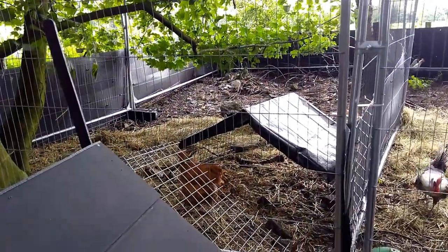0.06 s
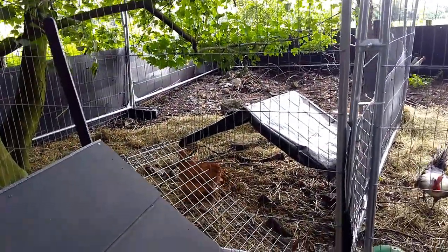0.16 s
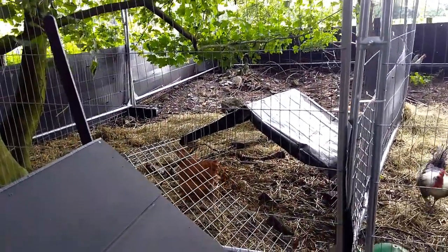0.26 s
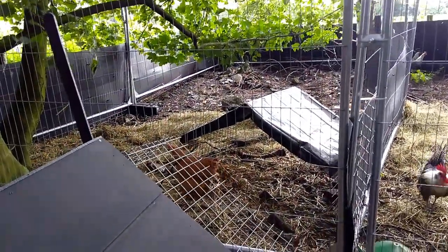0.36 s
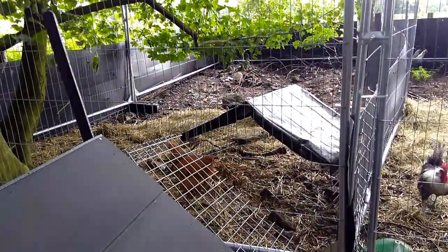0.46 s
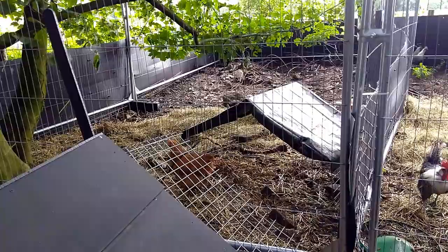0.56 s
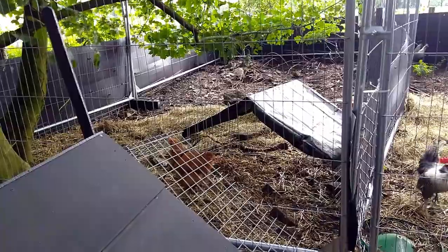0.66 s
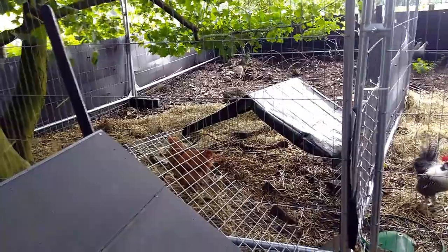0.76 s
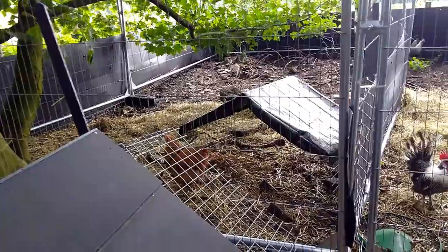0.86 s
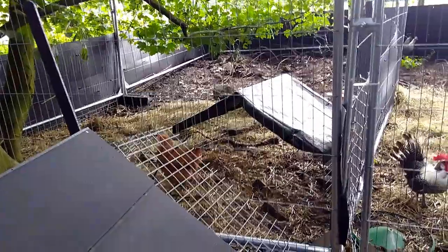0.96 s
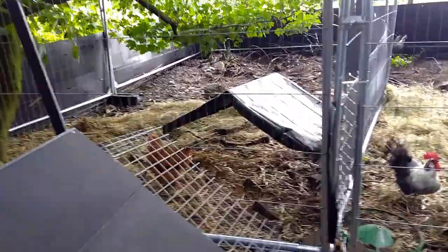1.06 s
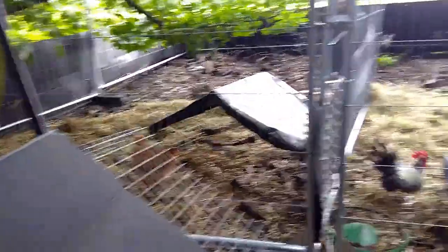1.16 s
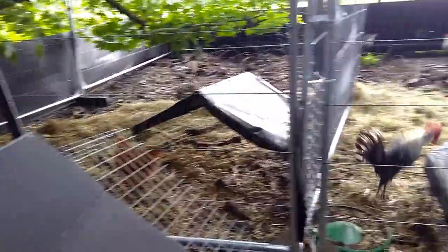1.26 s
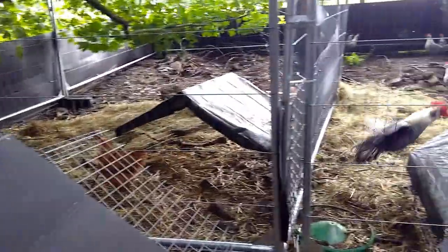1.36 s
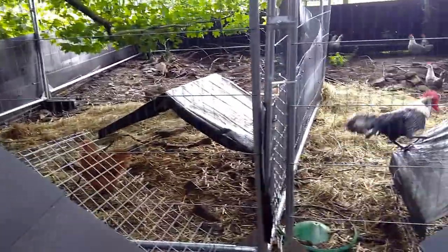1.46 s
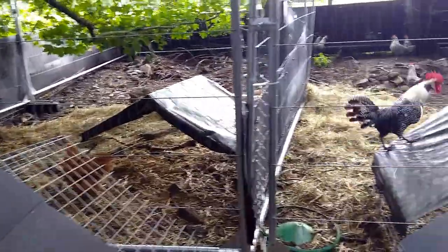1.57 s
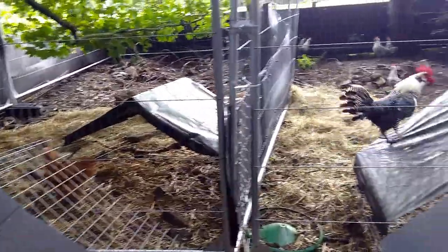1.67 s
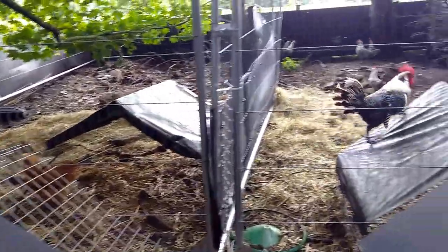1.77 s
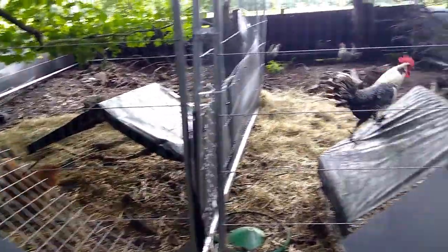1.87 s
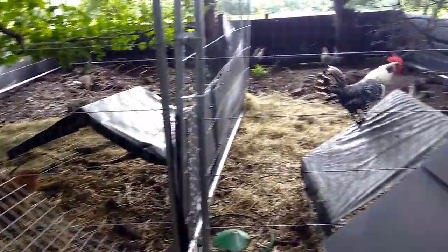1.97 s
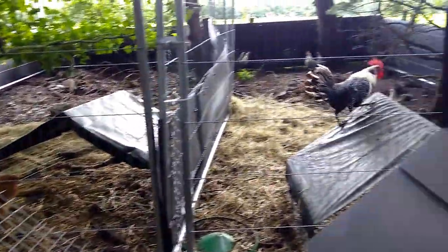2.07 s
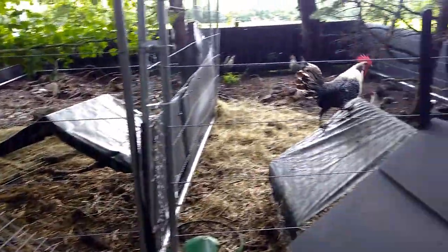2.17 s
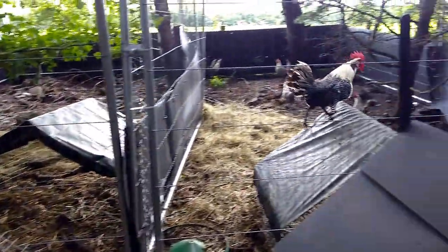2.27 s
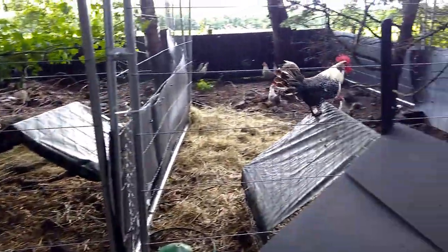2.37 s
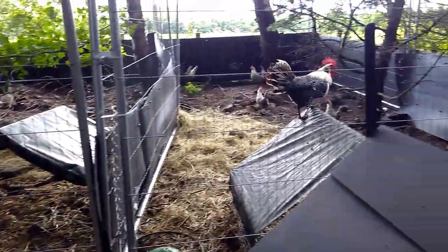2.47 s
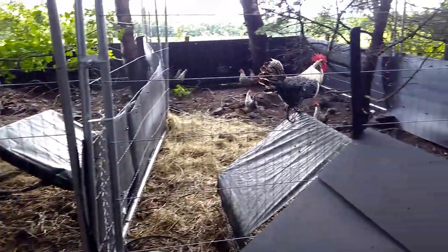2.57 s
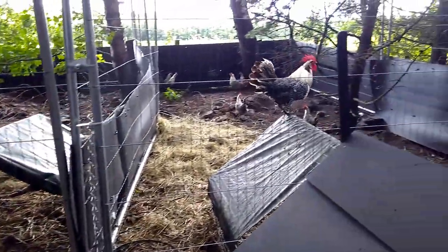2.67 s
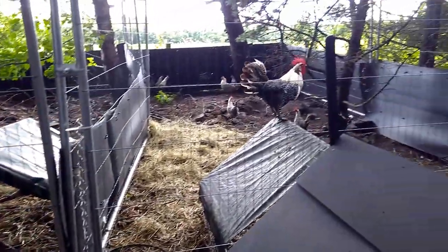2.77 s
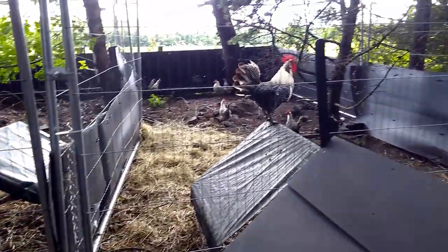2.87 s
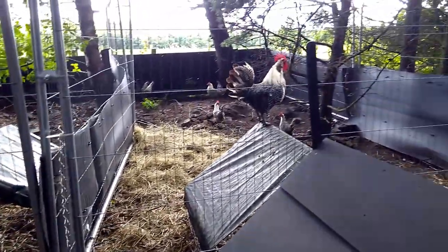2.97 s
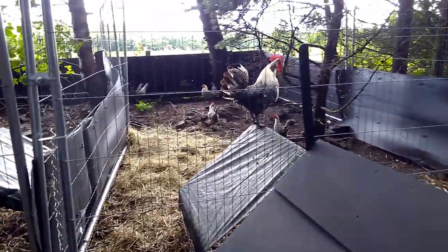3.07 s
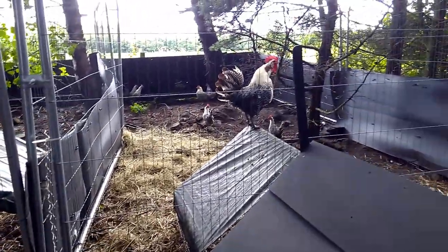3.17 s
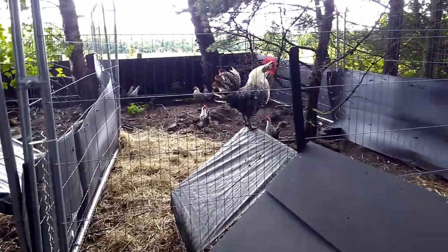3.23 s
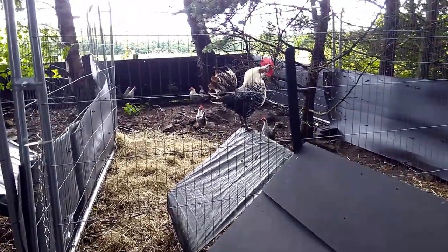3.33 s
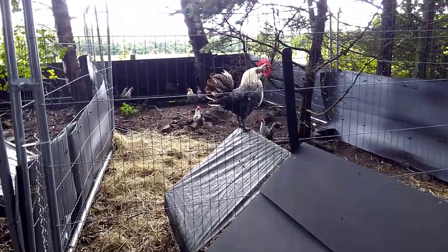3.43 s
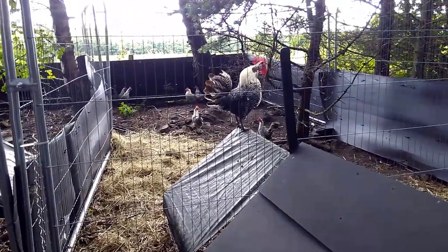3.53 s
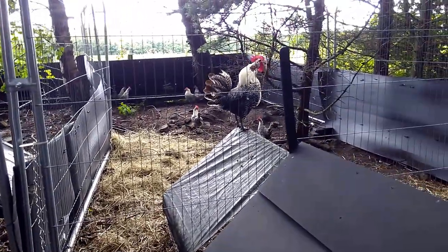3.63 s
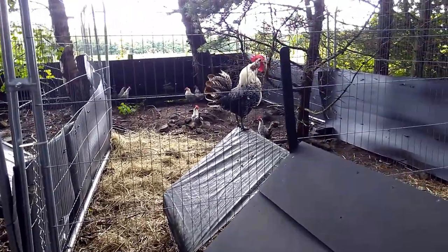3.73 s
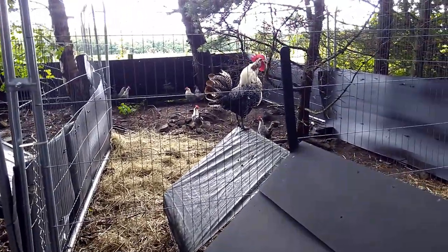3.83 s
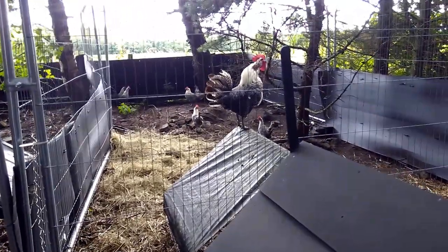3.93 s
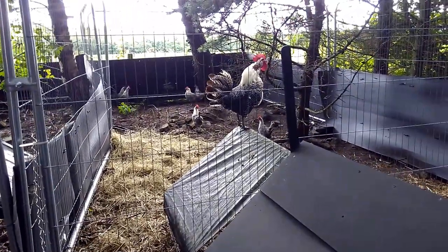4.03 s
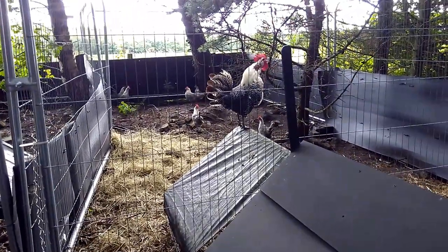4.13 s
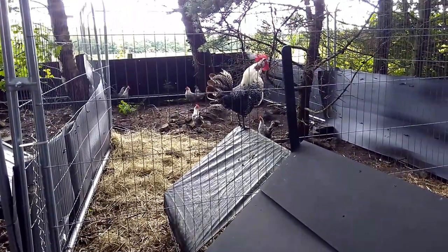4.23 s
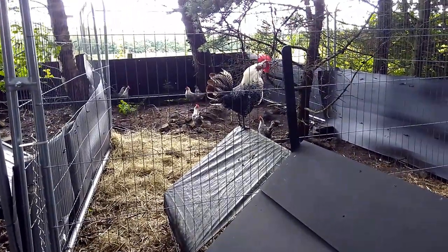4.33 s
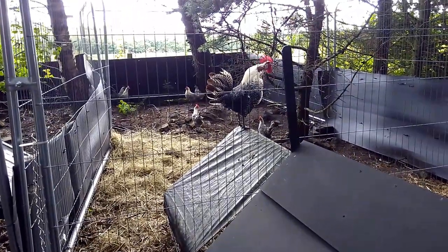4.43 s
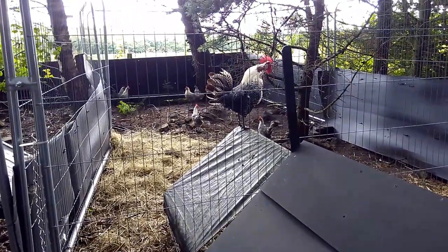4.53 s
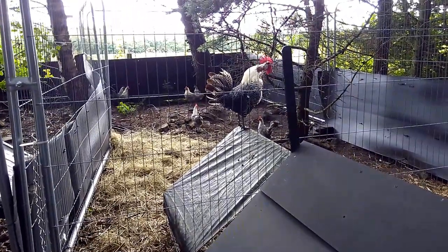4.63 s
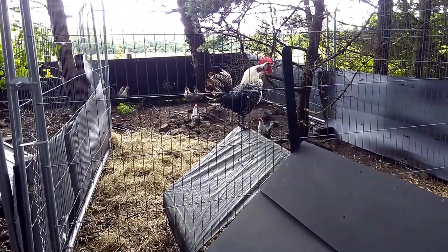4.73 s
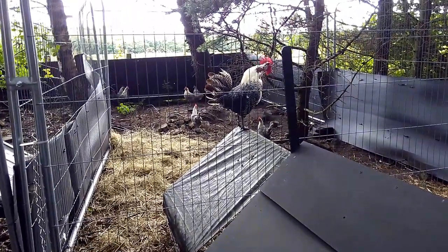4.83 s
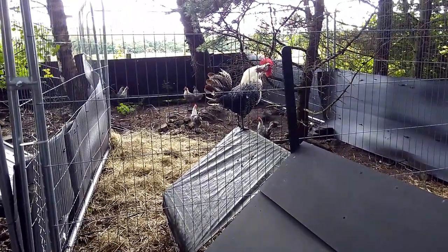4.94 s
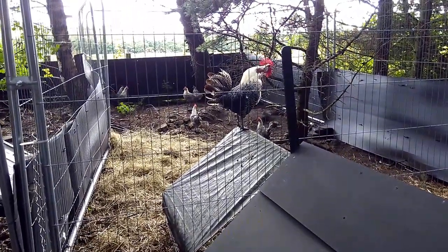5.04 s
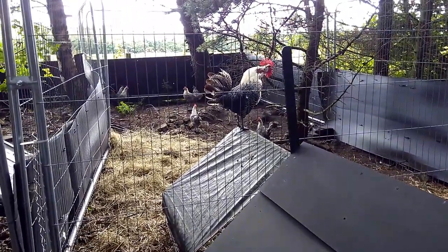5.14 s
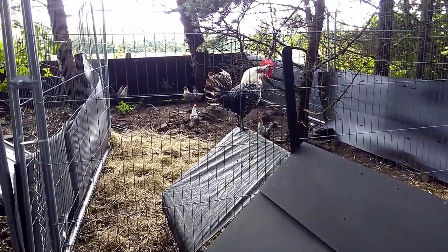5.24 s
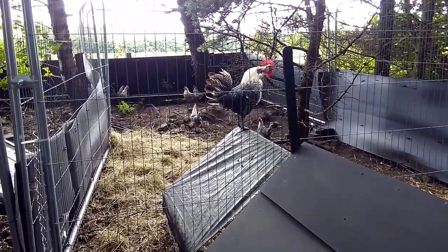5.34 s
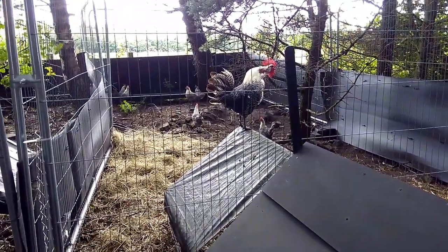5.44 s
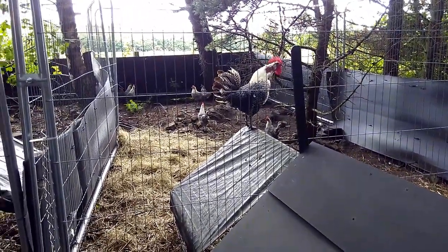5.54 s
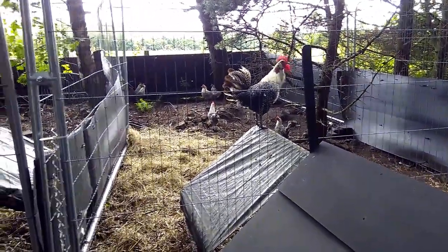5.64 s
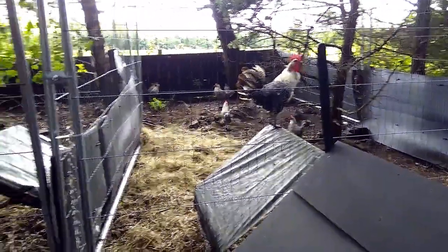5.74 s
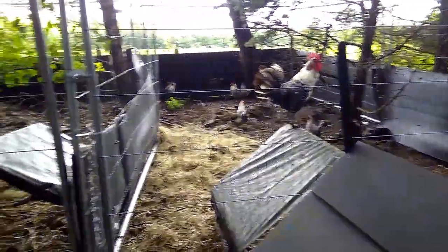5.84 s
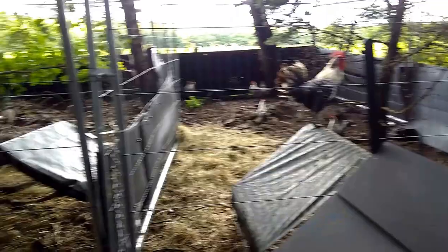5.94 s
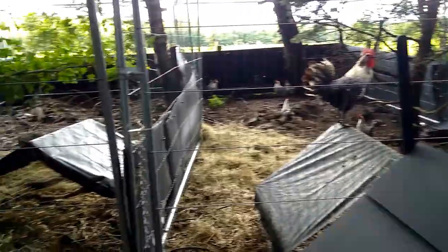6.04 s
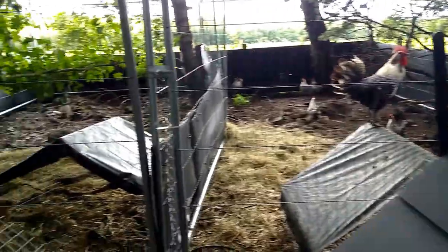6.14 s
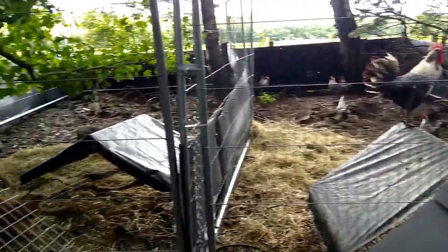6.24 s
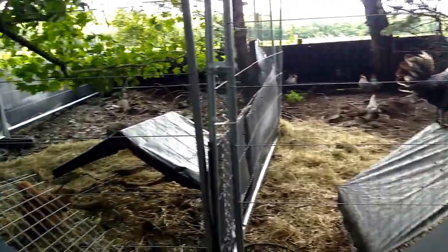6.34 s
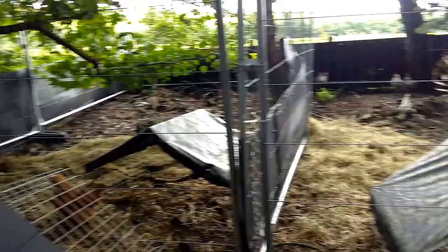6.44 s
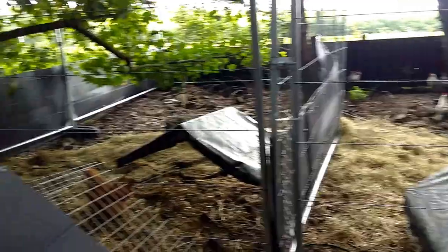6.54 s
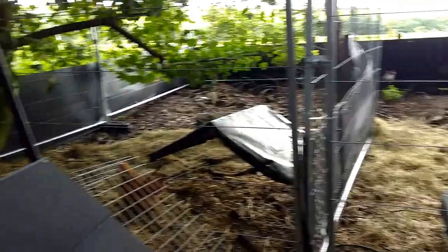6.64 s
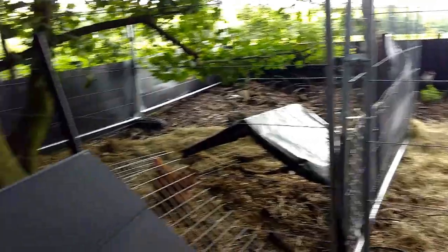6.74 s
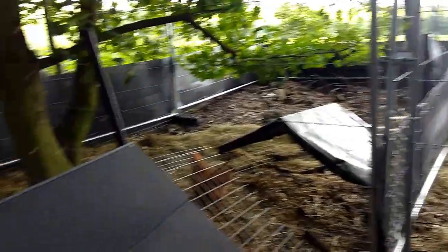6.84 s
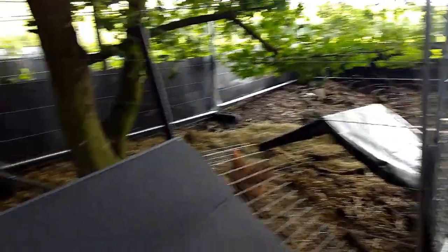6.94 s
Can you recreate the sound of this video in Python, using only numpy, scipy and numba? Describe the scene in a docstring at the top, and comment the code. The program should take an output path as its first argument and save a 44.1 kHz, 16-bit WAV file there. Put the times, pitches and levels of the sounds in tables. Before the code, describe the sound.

A breezy poultry yard heard through a handheld phone's wide stereo microphones. A faint low hush of distant traffic and leaves runs throughout, with irregular wind rumbles and bumps, strongest near 1.25 s and 1.7 s. A light tap comes at 0.3 s, then a hen gives a few short, quiet, low clucks between 0.6 and 0.95 s. From about 1 s straw and feathers rustle; between 1.2 and 2.4 s claws crack, knock and rattle on a sheet-covered shelter. It calms, with a gust at 3.4 s. The rooster, a few metres away and slightly right, then crows loudly and hoarsely: short syllables at 3.4 and 3.7 s, a longer one from 3.85 to 4.25 s, and a raspy, sustained cry from 4.4 s, cut off around 5.5 s. Fences and a sheet wall return a brief ringing echo. Quiet hush remains, with a soft claw knock at 6.2 s, a wind bump near 6.65 s and light rustling to 7 s.

```python
"""Wind wobbles and rumbles at two microphone ports over a distant hush of noise bands; grains of straw and feathers rustle.
Claws click on a sheet-covered shelter: cracks with ringing bands. A hen clucks: pulses through throat modes.
From 3.4 s a rooster a few metres away crows four hoarse syllables: uneven pulses and air noise through
windpipe modes. A last claw click follows at 6.2 s. Fences and a far sheet wall echo rooster, hen and claws.
The phone widens its picture by taking a delayed copy of each port away from the other."""
import sys
import numpy as np
from scipy import signal
from scipy.fft import rfft, irfft
from scipy.io import wavfile
from scipy.ndimage import uniform_filter1d, minimum_filter1d
from numba import njit

SR = 44100
rng = np.random.default_rng(int(sys.argv[2]) if len(sys.argv) > 2 else 0)


def digitize_waveform(pressure):
    """Quantize a signal to 16-bit integers and store it at the path in sys.argv[1].

    Rows of a 2-D input are taken as channels; values are limited to [-1, 1].
    """
    field = np.atleast_2d(pressure).T
    bounded = np.clip(field, -1, 1)
    quanta = np.round(bounded * 32767).astype(np.int16)
    wavfile.write(sys.argv[1], SR, quanta)


N = 308700
TIME = np.arange(N) / SR


def undb(db):
    """Amplitude factor of a dB value."""
    return 10 ** (np.asarray(db) / 20)


def level(x, db):
    """Scale to an RMS in dB."""
    return x * undb(db) / np.sqrt(np.mean(x ** 2))


def curves(table):
    """Columns of a table, joined by straight lines in time."""
    time_s, *columns = np.transpose(table)
    return [np.interp(TIME, time_s, column) for column in columns]


def shaped(x, points, lag_s=0):
    """Filter by (frequency [Hz], gain) points, joined on a log frequency axis, and delay."""
    hz = np.fft.rfftfreq(N, 1 / SR)
    point_hz, point_gain = np.transpose(points)
    gain = np.interp(np.log(hz + 1), np.log(point_hz), point_gain)
    delay = np.exp(-2j * np.pi * hz * lag_s)
    return irfft(rfft(x) * gain * delay, N)


@njit
def svf(x, hz, width_hz):
    """State-variable band-pass with a moving centre and width, gain 1 at the centre."""
    y, band_state, low_state = np.empty(len(x)), 0., 0.
    for i in range(len(x)):
        g, k = np.tan(np.pi * hz[i] / SR), width_hz[i] / hz[i]
        v = (band_state + g * (x[i] - low_state)) / (1 + g * (g + k))
        band_state, low_state, y[i] = 2 * v - band_state, low_state + 2 * g * v, k * v
    return y


def band(x, hz, width_hz):
    """Band-pass with fixed or moving centre and width; the tiny offset avoids denormals."""
    return svf(x + 1e-18, hz * np.ones(len(x)), width_hz * np.ones(len(x)))


@njit
def snaps(hz, rough, chance):
    """A pulse at each wrap of the phase; roughness scatters the length and size of every cycle."""
    pulses, phase, p, k = np.zeros(len(hz) + 1), np.empty(len(hz)), 0., 0
    for i in range(len(hz)):
        step = hz[i] * np.exp(rough[i] * chance[k, 0]) / SR
        p += step
        if p >= 1:
            p, k = p - 1, k + 1
            size = 1 + 2 * rough[i] * chance[k, 1]
            # split over two samples: the wrap falls between them
            pulses[i] += size * p / step
            pulses[i + 1] += size * (1 - p / step)
        phase[i] = p
    return pulses[:-1], phase


def walk(rate_hz):
    """Random levels held 1 / rate_hz and slewed twice; spread near 1."""
    hold = int(SR / rate_hz)
    steps = np.repeat(rng.standard_normal(N // hold + 1), hold)
    return 1.56 * uniform_filter1d(uniform_filter1d(steps, hold), hold)[:N]


def surge(peak_s, db, rise_s, fall_s):
    """Gain that climbs to a peak and sinks again, straight in dB; rise and fall span 20 dB."""
    away = np.where(TIME < peak_s, (peak_s - TIME) / rise_s, (TIME - peak_s) / fall_s)
    return undb(db - 20 * away)


def scatter(x, t60_s, db):
    """A dying swarm of echoes, different at each port."""
    t = TIME[:SR]
    tails = rng.standard_normal((2, SR)) * np.exp(-np.log(1000) * t / t60_s) * (t > .004)
    tails /= np.sqrt(np.sum(tails ** 2, axis=1, keepdims=True))
    return undb(db) * signal.fftconvolve(x[None], tails, axes=1)[:, :N]


# colour of the near echoes: (frequency [Hz], gain [dB])
YARD_COLOUR_DB = [(400, -15), (1200, 1.5), (1800, 8.5), (2400, 0.5), (6000, 6.5), (15000, 8.5)]
YARD_T60_S, YARD_DB = .19, -9
WALL_HZ, WALL_WIDTH_HZ, WALL_T60_S, WALL_DB = 1770, 260, .6, -13


def yard(x, wall_db=0):
    """Near fences answer briefly; a far sheet wall rings on in one band."""
    coloured = shaped(x, [(hz, undb(db)) for hz, db in YARD_COLOUR_DB])
    near = scatter(coloured, YARD_T60_S, YARD_DB)
    ring = band(band(x, WALL_HZ, WALL_WIDTH_HZ), WALL_HZ, WALL_WIDTH_HZ)
    return near + scatter(ring, WALL_T60_S, WALL_DB + wall_db)


# overall hush: (time [s], level [dB])
HUSH_LEVEL = [(0.0, -45), (1.14, -47), (2.05, -45), (2.22, -50), (2.5, -52), (2.86, -49), (3.15, -45.5),
              (3.4, -48.5), (5.7, -50.5), (6.22, -45.5), (6.416, -44), (7.0, -45.5)]
# hush spectrum before levelling: (frequency [Hz], band gain [dB])
HUSH_BANDS = [(60, -16), (150, 13), (300, 7.5), (650, 8.5), (1200, -6), (2000, -19.5), (3500, -26),
              (6000, -40), (9000, -27), (15000, -30)]
HUSH_FLICKER_DB = 1.8


def hush():
    """Far traffic and leaves: half-octave bands that flicker alone, more alike at both ports in the bass."""
    out, (colour_hz, colour_db) = 0, np.transpose(HUSH_BANDS)
    for hz in 60 * 2 ** np.arange(0, 8.1, .5):
        mid, side = (band(band(rng.standard_normal(N), hz, hz / 2), hz, hz / 2) for _ in range(2))
        band_db = np.interp(np.log(hz), np.log(colour_hz), colour_db)
        gain = undb(band_db + HUSH_FLICKER_DB * walk(8.5))
        side_share = min(hz / 1100.0, 1)
        out = out + gain * (mid + side_share * side * np.array([[1], [-1]]))
    return level(out, 4.17) * undb(curves(HUSH_LEVEL)[0])


# lull between gusts, re port level: (time [s], level [dB])
LULL = [(0, -65), (2.0, -67), (2.5, -73), (3.2, -66.5), (3.5, -74), (4.15, -79), (4.8, -74), (5.2, -79),
        (5.6, -69), (7.0, -67)]
# gusts, re port level: (peak time [s], level [dB], rise over 20 dB [s], fall over 20 dB [s])
GUST_SURGES = [(.35, -60, .9, 0.071), (.76, -54, 0.087, 0.065), (.88, -55, .06, 0.095),
               (1.07, -48, 0.038, 0.037), (1.25, -34.5, 0.032, 0.0092), (1.48, -48, 0.49, 0.088),
               (1.69, -51, 0.097, 0.12), (1.73, -39.5, .04, 0.015), (2.01, -53, 0.13, 0.088),
               (2.24, -51, 0.13, 0.071), (2.65, -50.5, 0.046, 0.24), (3.38, -42, .05, 0.076),
               (5.01, -59, 0.21, .08), (5.45, -45.5, 0.066, 0.094), (5.85, -51, 0.13, .07),
               (6.2, -48.5, 0.045, 0.12), (6.41, -51.5, 0.098, 0.034), (6.66, -39, 0.086, .17)]
LULL_WANDER_DB = 3


def wind():
    """Eddies roll over each port on its own: a low wobble of wandering pitch inside a rumble."""
    out = []
    for port_db in (13, 16):  # left, right
        wobble_hz = 100 * np.exp(0.32 * walk(30))
        wobble = np.sin(2 * np.pi * np.cumsum(wobble_hz) / SR)
        rumble = band(band(rng.standard_normal(N), 80, 98), 82, 160)
        out.append(level(wobble * undb(2.0 * walk(30)) + level(rumble, -6.5), port_db))
    lull = undb(curves(LULL)[0] + LULL_WANDER_DB * walk(5.8))
    return np.array(out) * (lull + sum(surge(*row) for row in GUST_SURGES))


# steady stirring: (time [s], level [dB], body re level [dB])
STIR = [(0, -63, -1), (.65, -58.5, -5), (.91, -63.5, 1), (1.0, -60.5, -7), (1.5, -57.5, 3), (2.2, -61, 10),
        (2.58, -73, 6.5), (3.4, -66, 2), (5.6, -61.5, -1.5), (6.1, -67, -2.5), (6.3, -64.5, 2),
        (6.7, -70, 6), (6.8, -54, -10), (7.0, -56.5, -4)]
# scuffles in the straw: (peak time [s], level [dB], rise over 20 dB [s], fall over 20 dB [s], body re level [dB])
SCUFFLE_SURGES = [(1.01, -45.5, .02, 0.02, -27), (1.1, -42.5, 0.08, 0.13, -15),
                  (1.32, -39, 0.019, 0.095, -9), (1.449, -46.5, 0.015, 0.065, 9.5),
                  (1.67, -51.5, 0.032, 0.075, 3.5), (1.91, -50, 0.16, 0.056, 3.5),
                  (2.051, -42.5, 0.0053, 0.15, -6.5), (2.22, -62, 0.043, 0.019, 3),
                  (2.6, -64, 0.019, 0.18, -5), (2.66, -52, 0.018, 0.046, -14), (3.03, -74, 0.44, 0.19, -1),
                  (3.32, -63, 0.12, 0.23, -14)]


def rustle():
    """Straw and feathers: dense one-sample grains of uneven size, a bright part and a body with own levels."""
    stir_db, stir_body_db = curves(STIR)
    top_gain, body_gain = undb(stir_db), undb(stir_db + stir_body_db)
    for *shape, body_db in SCUFFLE_SURGES:
        scuffle = surge(*shape)
        top_gain = top_gain + scuffle
        body_gain = body_gain + scuffle * undb(body_db)
    out = []
    for side_db in (-1.5, 1.5):  # left, right
        grain_db = 2.1 * rng.exponential(size=N) + 1.0 * walk(24.19)
        grains = rng.standard_normal(N) * undb(grain_db)
        top = level(shaped(grains, [(4000, 0.09), (7000, 0.35), (9000, 0.85), (16000, 0.76)]), 3.6)
        body = level(band(grains, 1480, 1500), 1.5)
        out.append(undb(side_db) * (top_gain * top + body_gain * body))
    return np.array(out)


# claws and pecks: (time [s], ring peak [dB], ring frequency [Hz], crack re ring peak [dB], left minus right [dB])
CLAW_HITS = [(.329, -31, 1100, -28, 2), (1.232, -33, 796, -18, -3), (1.342, -25, 1100, 0.5, 1),
             (1.443, -32.5, 3200, 3, 10), (1.45, -21, 1360, -15, 4), (1.555, -35.5, 3000, -3, -6),
             (1.671, -25, 1600, -4, 15), (1.856, -26.5, 1340, -9, 16), (1.862, -26.5, 3380, -10, 8),
             (1.92, -27.5, 2300, 0.5, 11), (2.05, -51, 2000, 3, 3), (2.193, -31.5, 3480, 0, 12),
             (2.219, -27.5, 1470, 5.5, -7), (2.221, -23.5, 3450, -16, -10), (2.283, -24, 3330, -18, -10),
             (2.323, -41.5, 3000, 0, 8), (2.417, -42.5, 1550, -17, 16), (2.656, -52, 2940, 9, 4),
             (6.232, -32, 1150, -16, 8)]
RING_WIDTH = 1.1  # width over ring frequency
RATTLE_T60_S, CRACK_DECAY_S = 0.026, .001
CLAW_YARD_DB = -7
CLAW_WALL_DB = -16  # the far wall answers the claws more faintly


def claws():
    """A sharp crack, then the sheet rings and rattles briefly."""
    size = 4096
    out, t = np.zeros((2, N + size)), TIME[:size]
    noises = rng.standard_normal((len(CLAW_HITS), 2, size))
    for (time_s, db, hz, crack_db, pan_db), noise in zip(CLAW_HITS, noises):
        crack = undb(crack_db) * noise * np.exp(-t / CRACK_DECAY_S)
        rattle = 0.15 * noise[0] * np.exp(-np.log(1000) * t / RATTLE_T60_S)
        blow = (t == 0) + rattle
        ring = band(band(blow, hz, RING_WIDTH * hz), hz, RING_WIDTH * hz)
        hit = crack + ring / np.abs(ring).max()
        start = int(time_s * SR)
        out[:, start:start + size] += hit * undb(db + np.array([[pan_db], [-pan_db]]) / 2)
    return out[:, :N] + undb(CLAW_YARD_DB) * yard(out[0, :N], CLAW_WALL_DB)


# clucks: (start [s], length [s], pitch [Hz], level re voice [dB])
HEN_CLUCKS = [(0.581, 0.035, 275, -28.5), (0.764, 0.029, 278, -28.5), (0.871, 0.01886, 290, -42),
              (0.899, 0.051, 290, -34.5)]
# hen's throat resonances: (frequency [Hz], width [Hz], gain [dB])
HEN_MODES = [(290, 34, 6.5), (600, 48, 6), (820, 84, -1)]


def hen():
    """Short voiced clucks: slightly uneven pulses ring the throat modes."""
    pitch, gain = np.full(N, 300.), np.zeros(N)
    for start_s, length_s, pitch_hz, db in HEN_CLUCKS:
        x = (TIME - start_s) / length_s
        pitch[(x > -1) & (x < 2)] = pitch_hz
        gain += undb(db) * np.sin(np.pi * np.clip(x, 0, 1) ** 0.45)
    pulses, _ = snaps(pitch, np.full(N, .03), rng.standard_normal((N // 20, 2)))
    throat = sum(undb(db) * band(band(pulses, hz, width), hz, 2 * width) for hz, width, db in HEN_MODES)
    voice = gain * level(throat, -3.5)
    return voice + yard(voice)


FADE_POWER, ACCENT_S = 1.5, .03


def syllable(start_s, swell_s, power, end_s, fade_s, db, accent_db, sag_db_per_s):
    """Swell, accented onset, sagging hold, ever quicker fade."""
    t = np.clip(TIME - start_s, 0, None)
    accent = accent_db * np.exp(-np.clip(t - swell_s, 0, None) / ACCENT_S)
    held_db = db + accent - sag_db_per_s * np.minimum(t, end_s - start_s)
    fade_db = 20 * (np.clip(TIME - end_s, 0, None) / fade_s) ** FADE_POWER
    return np.minimum(t / swell_s, 1) ** power * undb(held_db - fade_db)


# windpipe: (time [s], lowest mode [Hz], its level [dB], middle mode [Hz], beak opening [dB], air hiss [dB])
WINDPIPE = [(3.42, 607.7, 2.5, 1660, -5.5, 8.5), (3.58, 618.3, 2.5, 1600, -4, 15),
            (3.69, 700.9, -1, 1670, -5, -1), (3.8, 749.6, -7.5, 1696, -6, 0.5),
            (3.9, 690.1, -4.5, 1640, -7.5, -2.5), (4.1, 700.2, -5, 1680, -2.7, 4.5),
            (4.3, 694.5, -10, 1670, -5, 3), (4.4, 632.3, -4.5, 1699, -2, 5.5),
            (4.87, 600, -3, 1760, 0.8, 9.5), (5.3, 607.4, -3.5, 1828, 3.5, 11),
            (5.54, 600, 6.5, 1740, 1.5, 12.5)]
LOW_WIDTH_HZ, MID_WIDTH_HZ = 95, 105
# the neck shortens for the middle syllables: (time [s], neck mode [Hz], its width [Hz], top hiss band [Hz])
NECK_MOTION = [(3.6, 2960, 90, 14100), (3.69, 3200, 260, 14150), (3.9, 3150, 240, 14150),
               (4.3, 3110, 200, 14050), (4.4, 2990, 80, 13700), (5.5, 2965, 70, 13400)]
NECK_DB, NECK_PER_BEAK = -14, 1  # the neck mode grows as the beak opens (dB per dB)
# (time [s], neck octave re neck mode [dB], top hiss band [dB])
NECK_SHINE = [(3.5, -14, -26), (3.75, -11, -27), (4.1, -7, -27.5), (4.5, -13, -27.5), (5.5, -11, -25.5)]
OCTAVE_RATIO, OCTAVE_WIDTH_HZ, TOP_WIDTH_HZ = 2.03, 260, 570  # ratio to the neck mode
# fixed resonances: (frequency [Hz], width [Hz], level [dB])
CHEST = [(780.3, 58, -8.5), (1100, 68, -6), (1238, 36, -7.5)]
# the same, level re beak opening
BEAK = [(1972, 42, -3), (2146.5, 70, 0.46)]
# upper modes: (multiple of the neck mode, width [Hz], level re air hiss [dB])
HISS = [(1.5, 910, -41), (2.32, 400, -42), (2.6, 489.5, -39.5), (3.0, 500, -50), (3.25, 730, -37),
        (3.9, 1220, -36.5), (4.8, 600, -46)]
# little passes below the lowest mode, between the chest modes or at the top: (frequency [Hz], gain)
BEAK_PASS = [(380, .35), (560, 1), (800, 1), (920, .5), (1050, 1), (3300, 1), (4200, .3)]
# crow: (start [s], swell [s], swell curve power, let go at [s], fade to lose 20 dB [s],
#        level [dB], onset accent [dB], sag [dB/s])
CROW = [(3.422, .016, .4, 3.525, .033, -19, 7.5, 35), (3.688, .007, .4, 3.772, .042, -16, 0, 0),
        (3.835, .065, 1.6, 4.23, .062, -15.5, 2, 0), (4.372, .075, .9, 5.475, .027, -17.5, 1, -1.5)]
ROUGHNESS = .17  # spread of cycle lengths


def rooster():
    """Syrinx membranes snap unevenly at the lowest windpipe mode; air hisses through the upper modes."""
    low_hz, low_db, mid_hz, beak_db, air_db = curves(WINDPIPE)
    neck_hz, neck_width_hz, top_hz = curves(NECK_MOTION)
    octave_db, top_db = curves(NECK_SHINE)
    neck_db = NECK_DB + NECK_PER_BEAK * beak_db

    pulses, phase = snaps(low_hz, np.full(N, ROUGHNESS), rng.standard_normal((N // 20, 2)))
    air = undb(2.5) * rng.standard_normal(N) * np.exp(-phase / 0.37)  # dies off through each cycle
    source = level(pulses - pulses.mean(), 0) + air
    source *= undb(1.04 * walk(150))  # the membranes catch and slip: the rasp

    def mode(hz, width_hz, db):
        """One resonance rung by the source, at its own level."""
        return undb(db) * level(band(band(source, hz, width_hz), hz, 3 * width_hz), 0)

    voice = mode(low_hz, LOW_WIDTH_HZ, low_db) + mode(mid_hz, MID_WIDTH_HZ, beak_db)
    voice += mode(neck_hz, neck_width_hz, neck_db)
    voice += sum(mode(*row) for row in CHEST)
    voice += sum(mode(hz, width, db + beak_db) for hz, width, db in BEAK)
    voice = shaped(voice, BEAK_PASS)
    voice += mode(OCTAVE_RATIO * neck_hz, OCTAVE_WIDTH_HZ, octave_db + neck_db)
    voice += mode(top_hz, TOP_WIDTH_HZ, top_db)
    voice += sum(mode(ratio * neck_hz, width, db + air_db) for ratio, width, db in HISS)
    voice /= np.sqrt(uniform_filter1d(voice ** 2, size=SR // 25))  # even level over 40 ms
    voice *= sum(syllable(*row) for row in CROW)
    # the bird stands to the right of the phone
    left = undb(-5.5) * voice
    right = shaped(voice, [(100, 1), (16000, 0.85)], lag_s=0.00012)
    return np.array([left, right]) + yard(voice)


def scene():
    """All layers, left and right port."""
    return hush() + wind() + rustle() + claws() + hen() + rooster()


# taken from the other port: (frequency [Hz], share)
CROSS_SHARE = [(50, 0.65), (2500, 0.87), (5000, 0.77), (7500, 0.56), (9500, 0.26), (13000, 0.19),
               (15500, 0.21)]
CROSS_LAG_S, LEFT_PORT_DB = 0.0004026, -0.93
CEILING, LOW_CUT_HZ, TOP_HZ = .93, 55, 15500


def record(dry):
    """Each channel loses a delayed copy of the other port; a limiter holds peaks; rumble and top are cut."""
    wide = (dry - shaped(dry[::-1], CROSS_SHARE, CROSS_LAG_S)) * undb([[LEFT_PORT_DB], [0]])
    wide = signal.sosfilt(signal.butter(2, LOW_CUT_HZ, "high", fs=SR, output="sos"), wide)
    peak_gain = np.minimum(1, CEILING / np.abs(wide).max(axis=0).clip(1e-9))
    wide = wide * uniform_filter1d(minimum_filter1d(peak_gain, size=441), size=441)
    return signal.sosfilt(signal.ellip(14, .3, 70, TOP_HZ, fs=SR, output="sos"), wide)


dry = scene()
out = record(dry)
digitize_waveform(out)
```